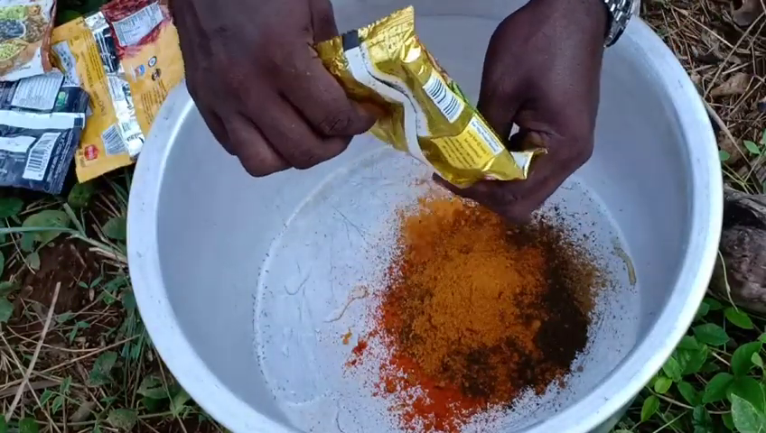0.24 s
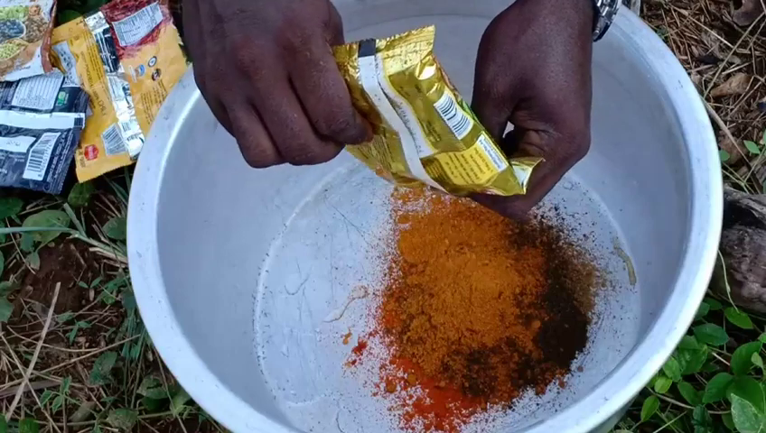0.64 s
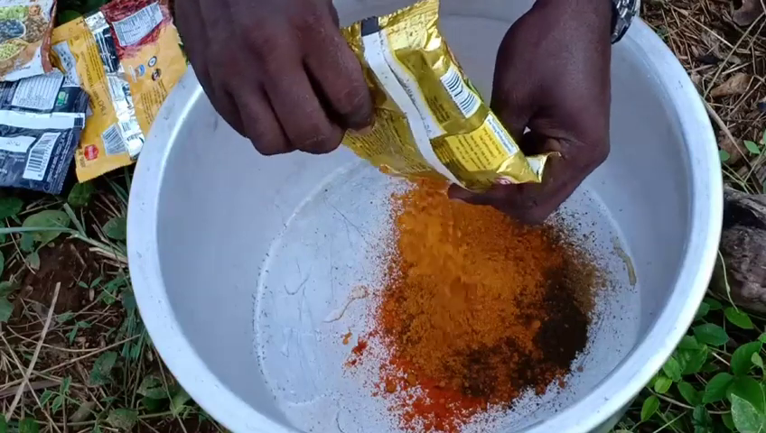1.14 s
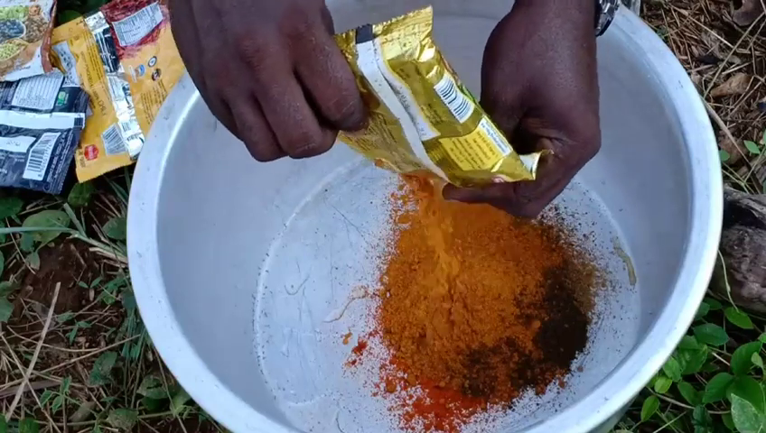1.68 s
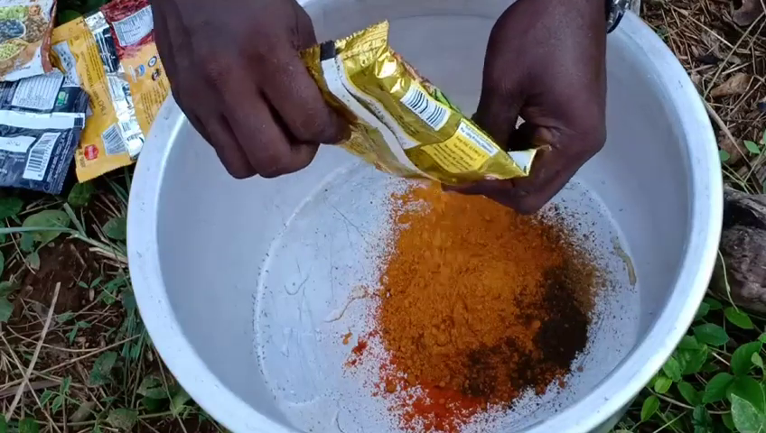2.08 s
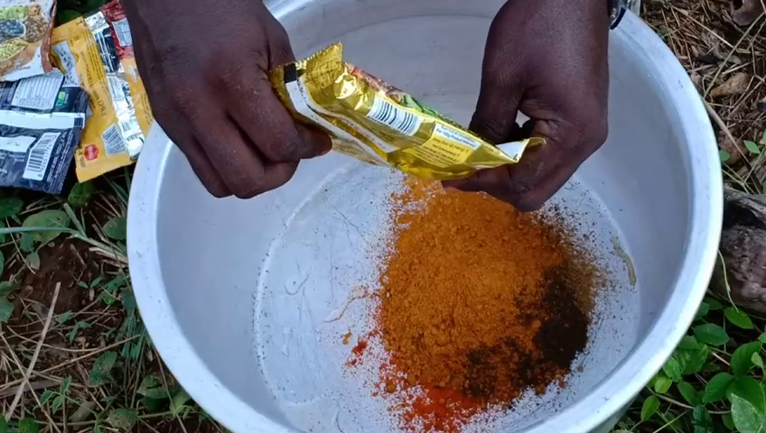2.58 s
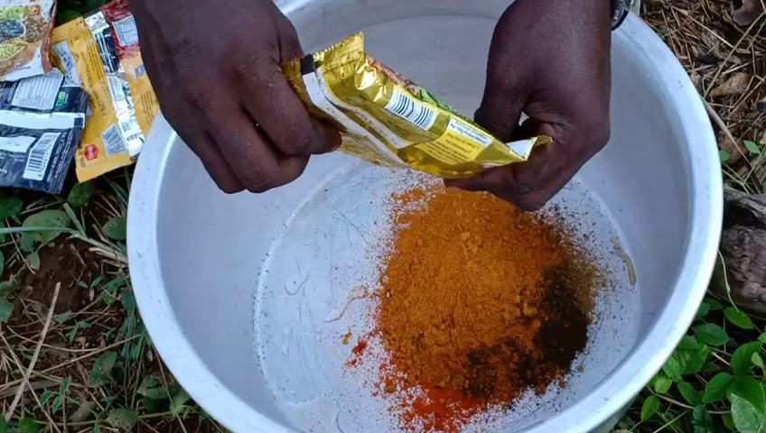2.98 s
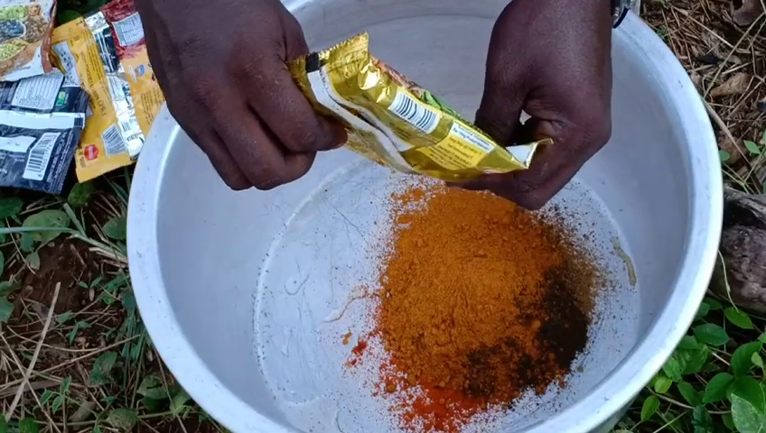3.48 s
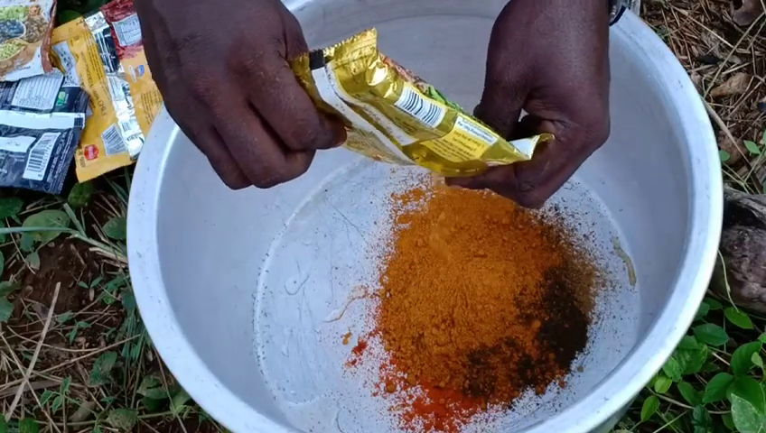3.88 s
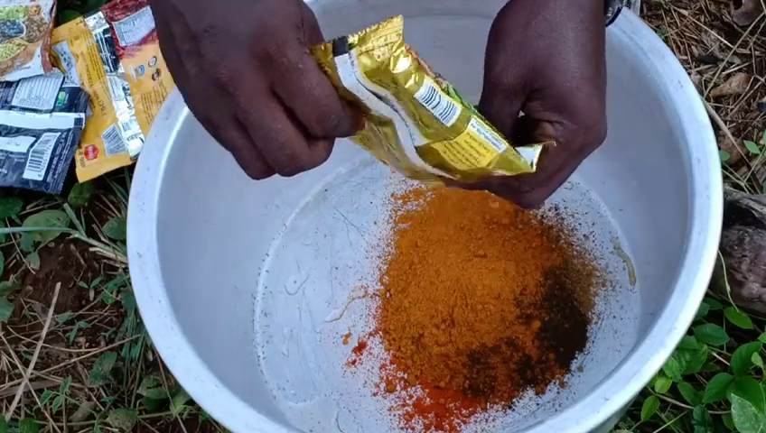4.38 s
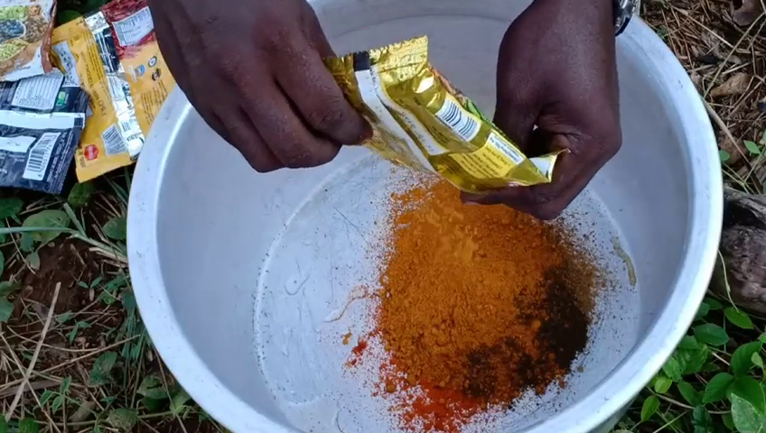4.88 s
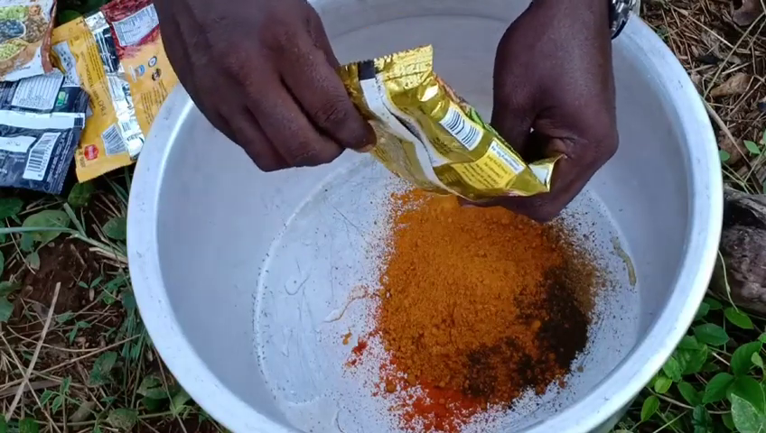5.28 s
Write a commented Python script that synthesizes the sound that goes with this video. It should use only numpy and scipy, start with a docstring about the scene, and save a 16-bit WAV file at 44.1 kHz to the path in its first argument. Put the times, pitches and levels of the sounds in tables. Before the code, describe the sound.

A foil spice packet crinkles and snaps sharply in shaking hands, close up, over quiet outdoor air with brief thin bird chirps.

```python
"""Two hands shake and squeeze a foil spice packet over a plastic basin, outdoors.
From the start creases snap through one by one, each a sharp stereo impulse rung through the packet and basin,
while squeezes set off swarms of tiny buckles and powder slides on the foil as a sparser, mostly fainter swarm.
Air noise and two far engine tones, sinking then rising, last throughout; whistled chirps come from 1 s to 2.6 s,
pouring powder hisses between 1.4 s and 2.4 s, and low wind bumps strike the left port from 2.8 s on."""
import sys
import numpy as np
from scipy import signal
from scipy.fft import rfft, irfft
from scipy.io import wavfile
from scipy.ndimage import uniform_filter1d

SR = 44100
rng = np.random.default_rng(int(sys.argv[2]) if len(sys.argv) > 2 else 0)


def persist_wave(psi):
    """Save psi, clipped to +-1, as 16-bit WAV."""
    counts = np.round(np.clip(psi, -1, 1) * 32767).astype(np.int16)
    wavfile.write(sys.argv[1], SR, np.atleast_2d(counts).T)


N = 244314
TIME = np.arange(N) / SR
CUTOFF_HZ = 15900


def from_db(db):
    """Decibel law: level in dB to amplitude ratio."""
    return 10 ** (np.asarray(db) / 20)


def rms_one(x):
    """Normalization to unit root mean square."""
    return x / np.sqrt(np.mean(np.abs(x) ** 2) + 1e-20)


def bins(size):
    """Discrete spectrum: the frequencies in Hz for that many samples, with zero raised to 1 Hz."""
    return np.maximum(np.arange(size // 2 + 1) * SR / size, 1)


def at_hz(points, hz):
    """Linear interpolation of a table on a log-frequency axis."""
    table_hz, values = np.transpose(points)
    return np.interp(np.log(hz), np.log(table_hz), values)


def above(hz, corner_hz):
    """Smooth high-pass weighting: a step from 0 to 1 around a corner frequency."""
    return 1 / (1 + np.square((corner_hz / hz) ** 2))


def causal(gain_db):
    """Minimum phase by cepstral folding: a response of unit energy that rings only after the blow."""
    cepstrum = irfft(np.log(from_db(gain_db)))
    half = len(cepstrum) // 2
    cepstrum[1:half] *= 2
    cepstrum[half + 1:] = 0
    return rms_one(np.exp(rfft(cepstrum)))


def spread(pair, likeness, hz):
    """Interchannel coherence: two unrelated spectra become left and right, alike to the given degree."""
    alike = np.clip(at_hz(likeness, hz), -.99, .99)
    common = np.sqrt((1 + alike) / 2) * pair[0]
    opposed = np.sqrt((1 - alike) / 2) * pair[1] * [[1], [-1]]
    return common + opposed


def noise(spectrum, likeness):
    """Spectral shaping of white noise: steady coloured stereo noise, rms 1."""
    hz = bins(N)
    stereo = spread(rfft(rng.standard_normal((2, N))), likeness, hz)
    return rms_one(irfft(stereo * from_db(at_hz(spectrum, hz)), N))


def swells(rows):
    """Addition of powers: a gain that rises and falls in one bell for each row."""
    power = sum(from_db(db) ** 2 * np.exp(-(2 * (TIME - s) / length) ** 2) for s, length, db in rows)
    return np.sqrt(power + 1e-18)


def add(out, sound, s):
    """Superposition: mixes a sound in at a time in seconds."""
    start = int(np.clip(s * SR, 0, N - 1))
    out[:, start:start + sound.shape[1]] += sound[:, :N - start]


# Colour of the outdoor air. Each row: frequency in Hz, relative spectral level in dB.
AIR_COLOUR = [(15, -41), (25, -6), (35, -22), (53, -13), (86, -10.5), (227, -13), (631, -13), (1300, -17),
              (2300, -15.5), (3340, -24), (5580, -27.5), (7700, -35), (9810, -36), (13500, -35.5),
              (15500, -39)]
# Left-right likeness of the air. Each row: frequency in Hz, coherence as a fraction.
AIR_COHERENCE = [(60, 0.34), (130, 0.67), (300, 0.35), (700, 0.24), (1400, 0), (3000, 0.18), (15000, 0)]


def air():
    """Stationary random noise: still outdoor air, mostly low and only partly alike in the two channels."""
    return from_db(-39 - 3.5) * noise(AIR_COLOUR, AIR_COHERENCE)


# Pitch of the far engine. Each row: time in seconds, frequency of its second order in Hz.
ENGINE_PITCH = [(0, 64.5), (.5, 64), (1.1, 61), (1.65, 60.5), (2.4, 60.5), (3.1, 63), (3.6, 65), (4.0, 63),
                (4.6, 65), (5.1, 69), (5.54, 70)]
# Tones of the engine. Each row: order as a multiple of the turning rate, rms level in dB.
ENGINE_TONES = [(2, -58.5), (3, -59.5)]


def engine():
    """Harmonic orders of rotation: only two low ones carry this far."""
    turns = np.cumsum(np.interp(TIME, *np.transpose(ENGINE_PITCH))) / (2 * SR)
    return sum(from_db(db) * np.sqrt(2) * np.sin(2 * np.pi * round(order) * turns)
               for order, db in ENGINE_TONES)


# Chirps of the bird. Each row: middle in seconds, top of the arch in Hz, peak level in dB.
BIRD_CHIRPS = [(1.05, 4670, -60), (1.16, 4840, -45), (1.245, 5350, -50), (1.295, 4820, -50),
               (1.42, 5130, -52), (1.465, 5300, -52), (1.53, 5170, -55), (1.706, 5200, -49),
               (1.78, 5250, -54), (2.235, 5060, -46), (2.345, 5260, -47), (2.555, 5000, -50)]


def bird(length_s=0.066, arch_hz=420, waver_hz=95):
    """Frequency modulation: thin whistles that arch up and down again with a random waver."""
    out = np.zeros((2, N))
    place = np.linspace(-1, 1, int(length_s * SR))  # from start to end of a chirp
    for s, top_hz, db in BIRD_CHIRPS:
        waver = rms_one(uniform_filter1d(rng.standard_normal(SR // 4), size=60))[:len(place)]
        hz = top_hz - arch_hz * place ** 2 + waver_hz * waver
        whistle = (1 - place ** 2) * np.sin(2 * np.pi * np.cumsum(hz) / SR)
        add(out, from_db(db) * whistle[None], s - length_s / 2)
    return out


# Puffs of wind. Each row: middle in seconds, length in seconds, frequency in Hz, peak level in dB.
WIND_PUFFS = [(2.855, 0.016, 89, -22), (2.946, 0.022, 74.3, -31.5), (3.325, 0.029, 92, -33),
              (3.433, 0.03, 99.8, -31), (5.043, 0.029, 89, -32.5), (5.121, 0.015, 80.9, -22.5),
              (5.265, 0.018, 92.7, -26)]


def wind():
    """Local pressure fluctuation: each puff pushes the air in the left port to and fro a few times."""
    bumps = np.zeros(N)
    for s, length, hz, db in WIND_PUFFS:
        bell = np.exp(-(2 * (TIME - s) / length) ** 2)
        bumps += from_db(db) * bell * np.sin(2 * np.pi * (hz * TIME + rng.random()))
    return bumps * np.array([[1], [0]])


# Dull flexes of the pouch. Each row: start in seconds, frequency in Hz, relative level before decay in dB.
POUCH_FLEXES = [(0.591, 247, -29.5), (.594, 780, -36), (1.066, 746, -30), (2.743, 740, -33),
                (2.954, 760, -34), (3.955, 295, -26), (4.488, 201, -28.5), (5.106, 200, -29),
                (5.169, 367, -31)]


def flexes(t60=0.066, rise_s=0.00088):
    """Damped oscillation: the pouch walls bulge with a soft, low pop."""
    out = np.zeros(N)
    for s, hz, db in POUCH_FLEXES:
        t = np.clip(TIME - s, 0, 1)
        envelope = from_db(db - 60 * t / t60) * (1 - np.exp(-t / rise_s))
        out += envelope * np.sin(2 * np.pi * hz * t)
    return out


# Colour of the foil. Each row: frequency in Hz, relative spectral level in dB.
FOIL_COLOUR = [(88, -42.5), (150, -20.5), (550, -10), (860, -8.5), (1110, -8), (1630, -6), (2180, -1),
               (2550, -2), (3280, -9), (5540, -12.5), (9730, -28), (11400, -24), (12500, -40),
               (13500, -20.5), (15500, -47.5)]
# Narrow resonances of packet and basin. Each row: frequency in Hz, width in Hz, gain in dB.
PACKET_RESONANCES = [(862, 64, 4), (972, 170, -3.5), (2120, 140, 1), (4000, 100, -1.5), (5450, 2300, 6.5),
                     (12120, 850, 7.5), (13100, 900, -2), (15100, 670, 21)]
# Scatter inside the basin, also used for the pouring. Each row: frequency in Hz, coherence as a fraction.
BASIN_COHERENCE = [(200, 1), (850, 0.94), (1220, 0.61), (1600, 0.92), (3000, 0.64), (5500, 0.31),
                   (9000, 0.019), (14000, 0.18)]


def buckle(body_db, bright_db, ring_hz, ring_db=6.0, ring_q=6.8, scatter_db=4.5, scatter_t60=0.027,
           facet_db=3.0, bend_s=0.0007994, jerk_db=-6.0, jerk_s=0.0016, top_share=0.91,
           lag_s=2.7e-5, lag_spread_s=1.0e-5, size=3072):
    """Snap-through instability: one facet flips with a double crack and a short ring. Stereo, unit energy."""
    t, hz = np.arange(size) / SR, bins(size)
    # diffuse reflections build up quickly, then die away
    dying = rms_one(from_db(-60 * t / scatter_t60)) * (1 - np.exp(-t / 0.00022))
    scatter = spread(rms_one(rfft(rng.standard_normal((2, size)) * dying)), BASIN_COHERENCE, hz)
    # bending waves bring the low notes later; the crack usually reaches the right port a little earlier
    lag = (lag_s + lag_spread_s * rng.standard_normal()) * np.array([[.5], [-.5]])
    crack = np.exp(-2j * np.pi * (2 * bend_s * np.sqrt(hz * ring_hz) + hz * lag))
    # the facet is stopped again with a jerk the other way, after a random multiple of jerk_s
    jerk_delay = jerk_s * rng.uniform(0.553, 2)
    crack = rms_one(crack * (1 - from_db(jerk_db) * np.exp(-2j * np.pi * hz * jerk_delay)))
    colour = at_hz(FOIL_COLOUR, hz)
    for f, width, db in [*PACKET_RESONANCES, (ring_hz, ring_hz / ring_q, ring_db)]:
        colour = colour + db / (1 + (2 * (hz - f) / width) ** 2)
    # big facets add body, small ones brightness up to the very top
    colour = colour + body_db * (1 - above(hz, 1150))
    colour = colour + bright_db * (above(hz, 3440) + top_share * above(hz, 15000))
    # each facet has lesser peaks of its own
    own = np.interp(np.log(hz), np.linspace(np.log(300), np.log(16000), 36), rng.standard_normal(36))
    response = causal(colour + facet_db * own)
    return rms_one(irfft((crack + from_db(scatter_db) * scatter) * response)) / np.sqrt(size)


def swarm(gain, per_s, size_spread_db, body_db, bright_db, ring_hz=2300, ring_spread=0.28, even_s=0.03,
          count=10):
    """Random impulse process: tiny buckles dealt to a few facets, sharing strain so the level follows gain."""
    sizes = from_db(size_spread_db * np.minimum(rng.exponential(1, N), 3)) * rng.choice([-1, 1], N)
    clicks = sizes * (rng.random(N) < per_s / SR)
    # neighbouring clicks share the power within even_s
    local_power = uniform_filter1d(clicks ** 2, int(even_s * SR) + 1)
    clicks = gain * clicks / np.sqrt(np.abs(local_power) + 1e-9)
    dealt = rng.integers(0, count, N)
    out = np.zeros((2, N))
    for k, hz in enumerate(ring_hz * np.exp(ring_spread * np.linspace(-1, 1, count))):
        own_clicks = (clicks * (dealt == k))[None]
        out += signal.oaconvolve(own_clicks, buckle(body_db, bright_db, hz), axes=1)[:, :N]
    return out


# Pours of powder. Each row: middle in seconds, length in seconds, relative level in dB.
POWDER_POURS = [(1.44, 0.031, -44), (1.555, 0.13, -40), (1.69, .06, -46), (2.355, .04, -45)]
# Colour of the pouring. Each row: frequency in Hz, relative spectral level in dB.
POWDER_COLOUR = [(1000, -33), (2000, -22), (2300, 6), (2420, 2), (2520, -10), (2680, 9), (2900, -24),
                 (5000, -45)]


def pouring():
    """Resonant noise: a soft hollow hiss that swells while the powder pours."""
    return swells(POWDER_POURS) * noise(POWDER_COLOUR, BASIN_COHERENCE)


# Rustle of powder and fingers on the foil. Each row: time in seconds, relative level in dB.
SLIDING_LEVEL = [(0.0, -55), (0.15, -34.5), (0.45, -51), (0.65, -35.5), (0.9, -39.5), (1.3, -39),
                 (1.55, -37), (1.85, -43), (2.35, -37.5), (2.7, -44), (3.1, -36.5), (3.5, -45.5),
                 (3.68, -33.5), (4.1, -43), (4.4, -36.5), (4.85, -46.5), (5.15, -31), (5.54, -57)]


def sliding(trim_db=-5.0):
    """Friction as a train of small impulses: powder and fingers slide on the foil in a sparse, faint rustle."""
    gain = from_db(np.interp(TIME, *np.transpose(SLIDING_LEVEL)))
    return from_db(trim_db) * swarm(gain, per_s=200, size_spread_db=7.5, body_db=6.0, bright_db=-3.0,
                                    ring_spread=0.48, even_s=0.05, count=7)


# Squeezes of the packet. Each row: middle in seconds, length in seconds, relative crackle level in dB.
PACKET_SQUEEZES = [(0.041, 0.089, -25), (0.095, 0.0098, -25), (0.273, 0.098, -30.5), (0.388, 0.066, -35.5),
                   (0.461, 0.041, -24), (0.591, 0.029, -33.5), (0.86, 0.025, -25.5), (0.981, 0.012, -33),
                   (1.111, 0.041, -28.5), (1.198, 0.029, -35.5), (1.321, 0.026, -26.5), (1.502, 0.038, -24),
                   (1.612, 0.046, -26), (1.75, 0.032, -22), (1.961, 0.043, -33.5), (2.034, 0.021, -28.5),
                   (2.181, 0.049, -28), (2.308, 0.022, -21.5), (2.42, 0.039, -31.5), (2.531, 0.032, -26),
                   (2.873, 0.045, -25), (3.004, 0.026, -26), (3.128, 0.023, -24.5), (3.212, 0.018, -21),
                   (3.592, 0.048, -25.5), (3.719, 0.024, -24), (3.856, 0.025, -24.5), (3.954, 0.022, -23),
                   (4.334, 0.036, -26), (4.487, 0.029, -24.5), (4.617, 0.054, -29.5), (4.721, 0.024, -27.5),
                   (5.114, 0.095, -32), (5.191, 0.022, -26.5), (5.377, 0.051, -33), (5.484, 0.029, -26)]


def crackle(trim_db=-1.5):
    """Crackling noise: each squeeze is a swell of many tiny buckles."""
    return from_db(trim_db) * swarm(swells(PACKET_SQUEEZES), per_s=420, size_spread_db=5.5, body_db=4.5,
                                    bright_db=-3.5, ring_spread=0.34, even_s=0.0084)


# The loudest creases snapping through. Each row: time in seconds, relative level over the first 4 ms in dB,
# relative body in dB, relative brightness in dB, facet ring in Hz.
CREASE_SNAPS = [(0.0129, -23, -24, -1, 2610), (0.0308, -19, 2, -2.5, 2820), (0.045, -20, 4, -2, 1710.0),
                (0.079, -22.5, -9, 14, 2780), (0.086, -17.5, -1.5, -5.5, 3000), (0.096, -20, 6, 4, 2220),
                (0.2158, -26, 6, -25, 2120), (0.256, -26, -11, 0, 2080.0), (0.2923, -13.5, -12, -0.5, 2110),
                (0.3218, -28.5, 5, 3, 2520), (0.3303, -22, 16.5, 13, 2500), (0.363, -21, -3, -18, 1900),
                (0.3865, -23.5, 7, 12, 2220), (0.3939, -23, 0.5, -6, 2170), (0.4404, -17.5, 3, 8.5, 2570),
                (0.451, -41, 5, -3, 2520.0), (0.469, -23, 7, 8, 2110), (0.4783, -16.5, -10, 0, 2090),
                (0.4846, -19, -3, -10, 2100), (0.544, -31, 0, -21, 2480), (0.5726, -23.5, -8, -21, 2300),
                (0.5775, -24, -6, -1, 2510), (0.5953, -28, 4, -28, 2120.0), (0.6333, -30.5, 9, -30, 2150.0),
                (0.6865, -32.5, 7, -14, 1750.0), (0.7465, -31.5, -5, -1, 2330),
                (0.8479, -14, 6, 1.5, 2230.0), (0.8781, -24.5, 1, -8, 2050), (0.9104, -25.5, 7, 4.5, 2400),
                (0.972, -24, -8, 8, 1840), (0.9771, -24.5, 6.5, 6.5, 1760), (1.095, -16.5, 5.5, 3, 2620),
                (1.112, -18, 5, 4.5, 2550), (1.1342, -19.5, -2, 1.5, 2390), (1.1914, -23, -12, 0.5, 2330),
                (1.2079, -28.5, 12, -7, 2470), (1.2152, -29, 8, -2, 1940.0), (1.316, -23.5, 9, -6.5, 2180),
                (1.3433, -28, 0, 7, 2070.0), (1.3985, -29.5, 0, -6, 2200), (1.4814, -22.5, 0, -6, 2400),
                (1.4957, -21.5, 12.5, 3.5, 2250.0), (1.5124, -19, -1, 7, 2300),
                (1.5863, -18.5, 11.5, 8, 1880), (1.6282, -19.5, -9, -3, 2720), (1.6477, -28, 0, 21, 2680),
                (1.7243, -21.5, 3, 0.5, 2160), (1.7512, -17, -8, -13, 2620), (1.9182, -29, -13, -7.5, 1990),
                (1.9389, -17, 2.5, 7, 2560.0), (1.9616, -14, -7, 1, 2790), (2.0275, -29.5, -4, -2, 1860.0),
                (2.1534, -22.5, 16, 18, 2560), (2.163, -15, -16, 2, 2600), (2.1735, -24, 5, 1, 2160),
                (2.1836, -20.5, -13, 10, 2630), (2.2026, -23.5, -31, -7, 2140),
                (2.2219, -30.5, -6, 22, 2640), (2.282, -26.5, -8, -17, 2280), (2.3039, -20.5, 0, 6, 1990.0),
                (2.3173, -22, -8, 0, 2180), (2.4, -22, 8, 6, 1960), (2.4081, -19.5, -1, -2.5, 2040),
                (2.4248, -24.5, -3, -11, 2600), (2.5118, -25.5, -1, -6, 2400), (2.54, -23, 9.5, 4, 3600),
                (2.579, -16, -5, -3, 2220), (2.6903, -24, -4.5, -3.5, 2490), (2.85, -24.5, -8, 13, 2540),
                (2.8683, -13, -4.5, 0, 2280), (2.8765, -16, -6, -6, 2060), (2.911, -20.5, -7, 2, 2090.0),
                (2.986, -21, 6, 4, 2760), (2.9956, -22.5, -13, -7, 2540.0), (3.017, -24, 6, 3, 2160),
                (3.108, -25.5, -4, 9, 2590), (3.1222, -16, -15, -1.5, 2190), (3.132, -20.5, 7, -3.5, 2380),
                (3.1551, -27, -24, -9, 2520), (3.1943, -22.5, -5.5, 0, 2090), (3.4538, -28, 4, 3, 2540),
                (3.573, -24.5, -11, 5, 2500.0), (3.583, -16, -8, 2, 2710), (3.6064, -17.5, -10, 1, 2730),
                (3.699, -21.5, 1, 4, 2640.0), (3.7134, -21, -11, -9, 2530.0), (3.7222, -18, 3, 5, 2200),
                (3.765, -21, -3.5, -6.5, 2230), (3.839, -20, 2, 12, 2520), (3.8494, -22, -18, -12, 2330),
                (3.8708, -23, -9, 3, 2010), (3.8901, -29, -15, 3, 2070.0), (3.926, -25, -3, -9, 2120.0),
                (3.9449, -16.5, -6, 6, 2020), (3.9883, -19, -2.5, 2.5, 2000),
                (4.0828, -33.5, -16, -13, 1980), (4.1862, -31, 7, -6, 1900), (4.3062, -27, 6, 7, 2060),
                (4.3217, -19.5, 3.5, 5, 2120), (4.3343, -13.5, -2, 2, 2130.0), (4.367, -29, 4, -9.5, 2200),
                (4.3908, -22.5, -5, -8, 2330), (4.4247, -28.5, -1, -10, 2270), (4.4336, -31, 17, 1, 1990.0),
                (4.4736, -19.5, 3, 2.5, 2540), (4.4844, -11.5, 0.5, 3.5, 2550), (4.493, -18, 7, -2, 1950),
                (4.578, -28.5, 7, -3, 1600.0), (4.6217, -15, -15, -1, 2200), (4.695, -27.5, 1, -16, 1970),
                (4.7175, -26.5, 18, -3, 2660), (4.9496, -26.5, 2, 0.5, 2220), (5.0305, -20.5, -5, -2, 2140),
                (5.0935, -15, -7, 3, 2360), (5.102, -17.5, 4, 6, 2240), (5.1337, -20, 3, -1, 2510),
                (5.1972, -20, 3.5, -3, 2510), (5.337, -22.5, -2, 4.5, 2250), (5.3687, -20.5, -10, 3, 2020),
                (5.4071, -24, 16, -3, 2100), (5.4585, -22.5, 4, -2, 2100.0), (5.4851, -20, -2, -1, 2340.0)]


def snaps(level_db=2.0, body_db=-1.0, bright_db=0.0, give_db=-14.5, give_s=0.0021):
    """Elastic energy release: each big crease gives a little just before it snaps through."""
    out = np.zeros((2, N))
    for s, db, body, bright, ring_hz in CREASE_SNAPS:
        strength = from_db(db + level_db) * np.sqrt(.004 * SR)  # unit energy to level over 4 ms
        snap = strength * buckle(body + body_db, bright + bright_db, ring_hz)
        # the give comes earlier by a random multiple of give_s
        add(out, from_db(give_db) * snap, s - give_s * rng.uniform(0.5, 1.2))
        add(out, snap, s)
    return out


def scene():
    """Superposition of sources: the packet close by, slightly left, over the quiet outdoors."""
    packet = pouring() + sliding() + crackle() + flexes() + snaps()
    pan = from_db(np.array([[.5], [-.5]]) * 0.62)  # left exceeds right by 0.62 dB
    return air() + engine() + bird() + wind() + packet * pan


def record(dry):
    """Band limiting and saturation: the top is cut; the converter rests off zero and clips at full scale."""
    # 60 dB down from the stopband edge, which lies 800 Hz over the cutoff
    low_pass = signal.cheby2(16, 60, CUTOFF_HZ + 800, fs=SR, output="sos")
    cut = signal.sosfilt(low_pass, dry)
    return np.clip(cut + .011, -1, 1)


dry = scene()
out = record(dry)
persist_wave(out)
```